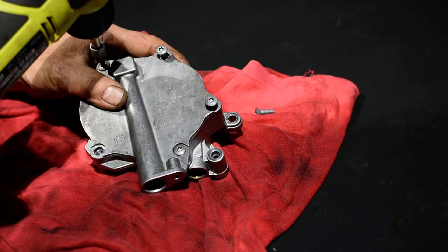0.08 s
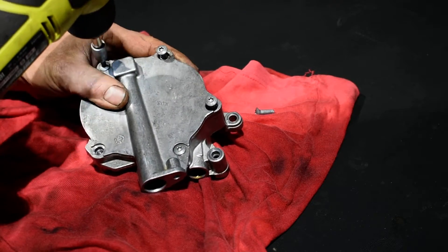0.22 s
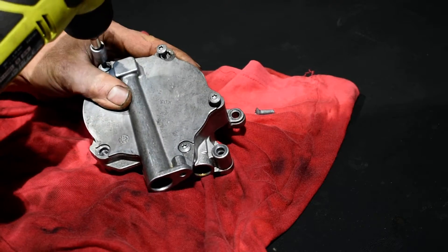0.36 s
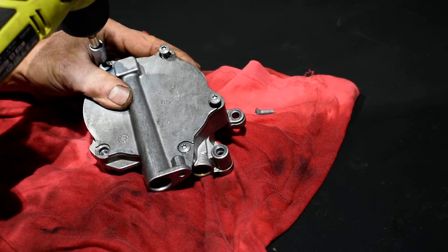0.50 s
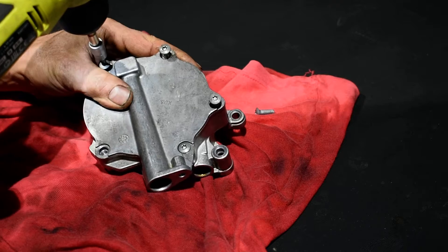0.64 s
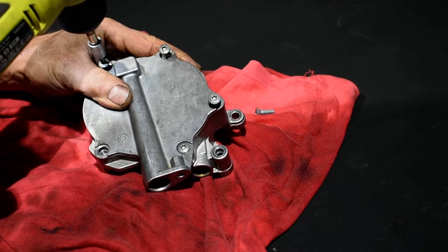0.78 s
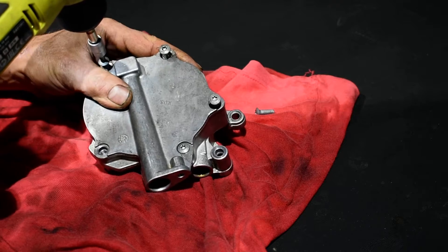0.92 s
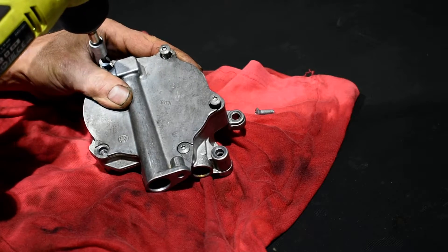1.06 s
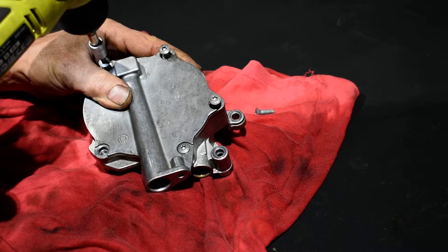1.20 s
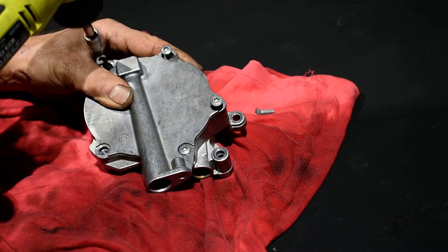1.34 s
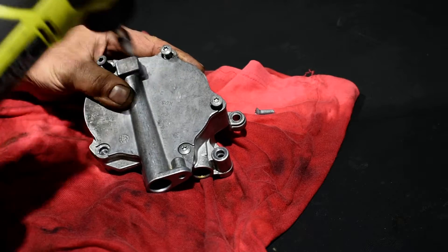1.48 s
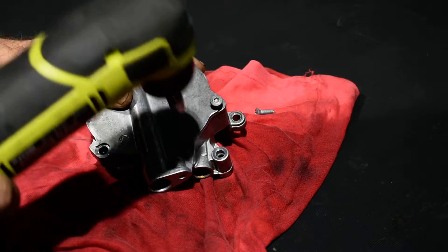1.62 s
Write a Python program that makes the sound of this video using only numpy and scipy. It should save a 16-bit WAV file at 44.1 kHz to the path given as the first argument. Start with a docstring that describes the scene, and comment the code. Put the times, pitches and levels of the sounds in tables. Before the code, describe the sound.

Close microphone on a small electric driver: faint handling ticks, a trigger snap, raspy gear whir rising in two steps with a hard clack, then a sudden clicking stop and soft room tail.

```python
"""A trigger snaps, a small motor whirs up in two steps, a socket clacks, and a brake stops it with a snap.
A cordless driver turns a bolt on a cast metal part lying on a rag, in a quiet workshop, one close microphone.
Brushes and gears are grainy noise through the resonant housing, with sine whines at multiples of shaft speed.
Clacks and faint ticks are clusters of touches that ring fading modes; the grip shudder is narrow low noise.
A diffuse room tail, still air and a wavering low hum lie behind the tool."""
import sys
import numpy as np
from scipy import signal
from scipy.fft import rfft, irfft
from scipy.io import wavfile

SR = 44100
rng = np.random.default_rng(int(sys.argv[2]) if len(sys.argv) > 2 else 0)


def to_linear_factor(level_db):
    """Convert decibel levels (scalar or array-like) to linear amplitude factors."""
    exponent = np.asarray(level_db, float) / 20
    return 10 ** exponent


def digitize_waveform(pressure):
    """Quantize a signal to 16-bit integers and store it at the path in sys.argv[1].

    Rows of a 2-D input are taken as channels; values are limited to [-1, 1].
    """
    field = np.atleast_2d(pressure).T
    bounded = np.clip(field, -1, 1)
    quanta = np.round(bounded * 32767).astype(np.int16)
    wavfile.write(sys.argv[1], SR, quanta)


N = 74970  # length in samples
SPLIT_HZ = 4790  # body below, treble above


def rms_one(x):
    """Scale a signal to rms 1."""
    return x / np.sqrt(np.mean(x ** 2) + 1e-20)


def in_time(rows):
    """Join the columns of a table by straight lines in time; the first column is seconds."""
    seconds, *columns = np.transpose(rows)
    return [np.interp(np.arange(N) / SR, seconds, column) for column in columns]


def at_hz(points, hz):
    """Read a table of (Hz, value) on a log-frequency axis."""
    table_hz, values = np.transpose(points)
    return np.interp(np.log(hz + 1), np.log(table_hz), values)


def coloured(noise, spectrum):
    """Shape a noise with a spectrum given in dB."""
    gain = to_linear_factor(at_hz(spectrum, np.fft.rfftfreq(len(noise), 1 / SR)))
    return irfft(rfft(noise) * gain, len(noise))


def filtered(x, order, hz, kind):
    """Butterworth filter."""
    return signal.sosfilt(signal.butter(order, hz, kind, fs=SR, output="sos"), x)


def drift(rate_hz):
    """Slow random wander of rms 1: noise through two equal low-pass poles, made at SR / 40."""
    r = np.exp(-2 * np.pi * rate_hz * 40 / SR)
    noise = rng.standard_normal(N // 40 + 2002)
    slow = signal.lfilter([1], [1, -2 * r, r * r], noise)[2000:]  # skip the settling
    return np.interp(np.arange(N) / 40, np.arange(len(slow)), rms_one(slow))


def resonance(x, hz, width_hz):
    """Two-pole band-pass with a gain of about 1 at its peak."""
    r = np.exp(-np.pi * width_hz / SR)
    zeros = np.array([1, 0, -1]) * (1 - r * r) / 2
    poles = [1, -2 * r * np.cos(2 * np.pi * hz / SR), r * r]
    return signal.lfilter(zeros, poles, x)


def narrow_noise(hz, width_hz):
    """Noise twice through one resonance, rms 1: a wavering low tone."""
    once = resonance(rng.standard_normal(N), hz, width_hz)
    return rms_one(resonance(once, hz, width_hz))


def workshop():
    """Still air as coloured noise, and a wavering low hum as narrow noise."""
    # Spectrum of the air. Each row: frequency in Hz, relative level in dB.
    air_spectrum = [(15, -42), (25, -23), (80, -14.5), (191, -8), (356, -15), (419, -12), (702, -16),
                    (1030, -14.5), (1140, -19), (13500, -78), (16300, -52)]
    air = rms_one(coloured(rng.standard_normal(N), air_spectrum))
    hum = narrow_noise(183.7, 23)
    return to_linear_factor(-53) * air + to_linear_factor(-60) * hum


def room(x):
    """Diffuse echo: noise in octave bands, each dying at its own pace, with a soft 8.6 ms start."""
    # Decay of the room. Each row: frequency in Hz, time to fall 60 dB in seconds.
    room_decay = [(200, 1), (1000, 0.93), (4000, 1.0), (10000, 0.62), (16000, 0.29)]
    echo_db = -16  # energy of the tail against the direct sound
    t, tail = np.arange(SR) / SR, 0
    octaves = 125 * 2. ** np.arange(8)
    for low, high in zip(octaves, octaves[1:]):
        band = filtered(rng.standard_normal(SR), 2, [low, high], "band")
        t60 = at_hz(room_decay, np.sqrt(low * high))
        tail = tail + band * to_linear_factor(-60 * t / t60)
    tail *= np.clip(t / 0.0086, 0, 1)
    tail /= np.sqrt(np.sum(tail ** 2))
    return to_linear_factor(echo_db) * signal.fftconvolve(x, tail)[:N]


def shudder():
    """Low shudder of the grip while the socket bites: narrow noise that swells and fades."""
    # Swell of the shudder. Each row: time in seconds, level in dB.
    shudder_swell = [(.22, -80), (.28, -54), (.36, -51), (.46, -62), (.6, -76)]
    swell_db, = in_time(shudder_swell)
    return to_linear_factor(swell_db) * narrow_noise(134, 56)


def clacks():
    """Each clack is a quick fading cluster of touches that strikes every mode with its own strength."""
    # Clacks of trigger, socket and brake. Each row: start in seconds, strength in dB before the trim
    # and the mode levels, treble over body in dB, bass over body in dB, length of the cluster in seconds.
    clack_rows = [(.1715, -26, -10, -4, 0.0021), (.1745, -15.5, 2.5, -14, .002), (.177, -19, -5, -3, .002),
                  (.269, -6, -7, 0, 0.0071), (.305, -8, 4.5, -10, 0.0031), (.3075, -6.5, -13, 1.5, .003),
                  (1.2935, -14, 0, 2, 0.0022), (1.2957, -4.5, 3.5, -11, 0.00092),
                  (1.299, -8, -4, -13, 0.0021), (1.3035, -8, -19, -5.5, 0.00295),
                  (1.38, -24, -14, -9, 0.0021)]
    # Faint ticks of finger and tool. Each row: start in seconds, strength in dB before the trim
    # and the mode levels, treble over body in dB, bass over body in dB, length of the cluster in seconds.
    tick_rows = [(0.112, -39, -10, -20, 0.0081), (.135, -48, -4, -6, .004), (.146, -45, 6, -8, 0.0024),
                 (.165, -41, 3, -8, 0.0041), (1.655, -43, 8, -10, .004)]
    # Modes that a clack rings. Each row: frequency in Hz, relative level in dB, 60 dB decay in seconds.
    tool_modes = [(526, -3, 0.017), (753, -4.5, .015), (1030, -3, 0.018), (1300, -5.5, 0.024),
                  (1680, 1, 0.0097), (2050, -4, 0.013), (2350, -3.5, 0.011), (2820, -3, 0.0074),
                  (3175, -3.5, 0.019), (4170, -2.5, 0.0081), (5360, -6, 0.0047), (7280, 1, 0.0083),
                  (8000, -2.5, 0.0071), (8570, 0, .008), (9400, -2.5, .006), (12000, -5.5, .003)]
    touches_each, bass_hz, low_cut_hz = 10, 1100, 300
    trim_db, fade_db, scatter_db = -17, 6, 3.0

    start, strength_db, treble_db, bass_db, length = np.array(clack_rows + tick_rows).T[:, :, None]
    late = np.sort(rng.random((len(start), touches_each)), axis=1)  # share of the cluster length
    late -= late[:, :1]  # the first touch falls on the start
    at = ((start + late * length) * SR).astype(int)
    ringing = np.zeros(N)
    for hz, mode_db, t60 in tool_modes:
        db = strength_db + (hz > SPLIT_HZ) * treble_db + (hz < bass_hz) * bass_db
        db = db + mode_db + trim_db - fade_db * late + rng.normal(0, scatter_db, late.shape)
        touches = np.full(N, 1e-18)
        np.add.at(touches, at, to_linear_factor(db) * rng.choice([-1, 1], late.shape))
        # each touch starts a dying sine
        r, w = to_linear_factor(-60 / (t60 * SR)), 2 * np.pi * hz / SR
        ringing += signal.lfilter([0, np.sin(w)], [1, -2 * r * np.cos(w), r * r], touches)
    return filtered(ringing, 4, low_cut_hz, "high")


def housing(x):
    """The shell lifts what falls on its resonances, one after another."""
    # Resonances of the housing. Each row: frequency in Hz, width in Hz, boost in dB.
    shell_resonances = [(1310, 95, 2), (1775, 250, 1.5), (2354, 120, 3.5), (3070, 170, 6), (3870, 250, 1.5),
                        (6320, 220, 4), (8134, 340, 5), (8450, 110, 2.5), (8930, 120, 0), (10800, 200, 1)]
    for hz, width_hz, boost_db in shell_resonances:
        x = x + (to_linear_factor(boost_db) - 1) * resonance(x, hz, width_hz)
    return x


def brush_and_gear_rasp(turn):
    """Sparse grains and steady noise throb once a turn, pass the housing, and get body and treble levels."""
    # Loudness of the rasp. Each row: time in seconds, body below the split in dB, treble above it in dB.
    rasp_levels = [(.163, -54, -63), (.18, -34.5, -44.5), (.26, -30.5, -30), (.3, -27, -33.5),
                   (.33, -26.5, -32), (.516, -25, -27.5), (.554, -29, -26.5), (.586, -21.5, -22),
                   (.732, -22.5, -20.5), (.82, -22.5, -19.5), (.9, -24, -21), (1.126, -23.5, -19.5),
                   (1.288, -24.5, -22.5), (1.31, -22.5, -23.5), (1.34, -28, -48), (1.39, -35, -65),
                   (1.45, -55, -73), (1.55, -62, -59)]
    # Colour of the rasp ahead of the housing. Each row: frequency in Hz, relative level in dB.
    rasp_spectrum = [(88, -46), (150, -25), (270, -21), (477, -8.5), (900, -2), (1460, 0.5), (2630, -2),
                     (3400, -4.5), (4740, -6), (6000, -5), (8200, -2), (11000, -2.5), (15500, -9)]
    grains_per_s, grain_spread_db = 6000, 2.5
    grain_share = 0.37  # of the power
    throb_depth, patchy_db = 0.1, 0.5

    grain_db = grain_spread_db * np.minimum(rng.exponential(1, N), 5)
    grains = (rng.random(N) < grains_per_s / SR) * to_linear_factor(grain_db) * rng.choice([-1, 1], N)
    hiss = rng.standard_normal(N)
    raw = np.sqrt(grain_share) * rms_one(grains) + np.sqrt(1 - grain_share) * hiss
    raw = raw * (1 + throb_depth * np.cos(turn))
    rasp = housing(coloured(raw, rasp_spectrum))

    body = rms_one(filtered(rasp, 2, SPLIT_HZ, "low"))
    treble = rms_one(filtered(rasp, 2, SPLIT_HZ, "high"))
    body_db, treble_db = in_time(rasp_levels)
    both = drift(8.3)  # unevenness that body and treble share
    body_db = body_db + patchy_db * (both + drift(30))
    treble_db = treble_db + patchy_db * (both + drift(27))
    # the minus sign keeps the two halves in phase at the split
    return body * to_linear_factor(body_db) - treble * to_linear_factor(treble_db)


def shaft_whines(turn):
    """Flickering sines locked to multiples of the shaft angle, lifted by the housing."""
    # Whines. Each row: multiple of shaft speed, level in dB at half trigger, level in dB at full trigger,
    # both before the gains in time and the housing.
    whine_rows = [(1.004, -61.5, -55), (1.985, -49.5, -61), (2.994, -56, -45), (3.993, -57, -36),
                  (5, -34.5, -35), (6.49, -47, -37), (9, -54, -40), (9.94, -48, -47), (12.02, -41, -34),
                  (20.04, -45, -37), (24.9, -55, -37.5), (26.2, -55, -50)]
    # Whines stand out while the speed holds. Each row: time in seconds, gain in dB on the half-trigger
    # levels, gain in dB on the full-trigger levels.
    steady_gains = [(.36, -36, -40), (.43, -1.5, -40), (.54, 1.5, -38), (.58, -23, -25), (.66, -40, -3.5),
                    (.9, -40, -1), (1.0, -40, 2), (1.24, -40, -0.5), (1.29, -40, 1), (1.31, -56, -30)]
    flicker_db, flicker_hz = 2.5, 8
    half_gain_db, full_gain_db = in_time(steady_gains)
    whines = np.zeros(N)
    for multiple, half_db, full_db in whine_rows:
        strength = to_linear_factor(half_db + half_gain_db) + to_linear_factor(full_db + full_gain_db)
        flicker = to_linear_factor(flicker_db * drift(flicker_hz))
        sine = np.sqrt(2) * np.sin(multiple * turn + rng.uniform(0, 2 * np.pi))
        whines += strength * flicker * sine
    return housing(whines)


def motor():
    """One slightly wavering shaft angle drives both the throb of the rasp and the pitch of the whines."""
    # Shaft speed before its waver. Each row: time in seconds, speed in turns per second.
    shaft_speed = [(.17, 60), (.34, 230), (.43, 257), (.48, 262), (.55, 272), (.63, 300), (.7, 309),
                   (.85, 316), (.98, 320.6), (1.2, 325), (1.245, 325), (1.29, 312), (1.36, 150)]
    speed, = in_time(shaft_speed)
    waver = 1 + 0.0012 * drift(16)
    turn = 2 * np.pi * np.cumsum(speed * waver) / SR  # shaft angle in radians
    return brush_and_gear_rasp(turn) + shaft_whines(turn)


def scene():
    """Tool, its echo and the workshop, alike in both channels."""
    tool = motor() + clacks() + shudder()
    return np.tile(tool + room(tool) + workshop(), (2, 1))


def roll_off(x):
    """The treble ends steeply here."""
    return signal.sosfilt(signal.butter(12, 16480, fs=SR, output="sos"), x)


def record(dry):
    """The top is cut steeply at 15.8 kHz and the microphone cuts the lowest bass below 60 Hz."""
    top_cut = signal.ellip(12, .5, 70, 15800, fs=SR, output="sos")
    mix = filtered(signal.sosfilt(top_cut, dry), 1, 60, "high")
    return roll_off(mix)


dry = scene()
out = record(dry)
digitize_waveform(out)
```